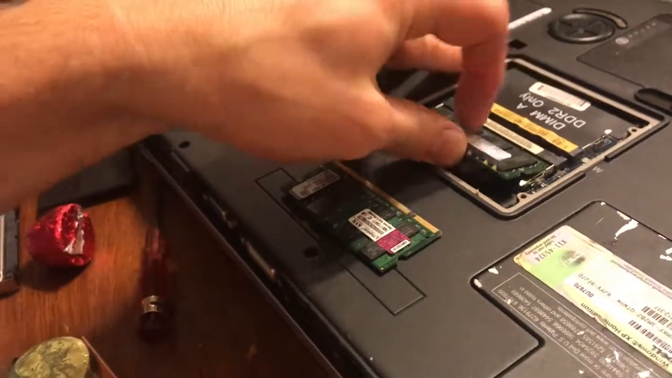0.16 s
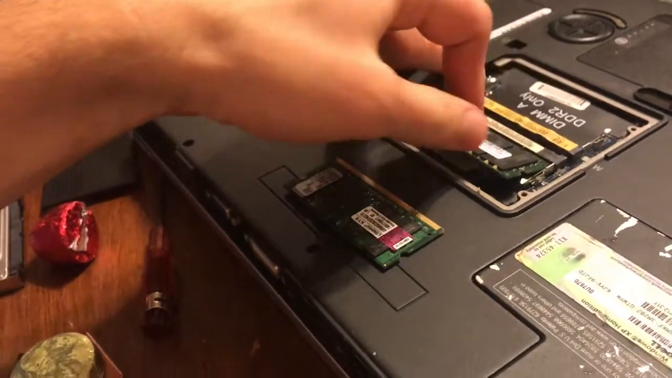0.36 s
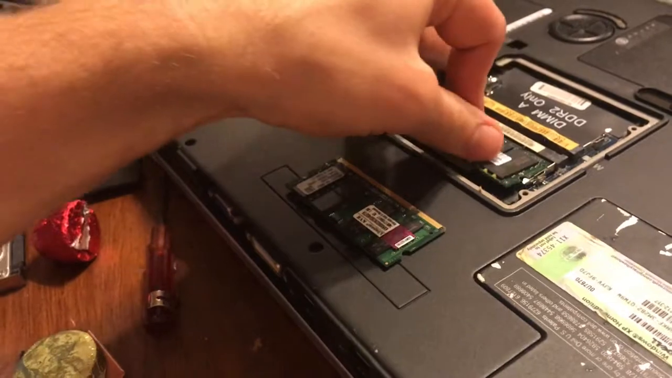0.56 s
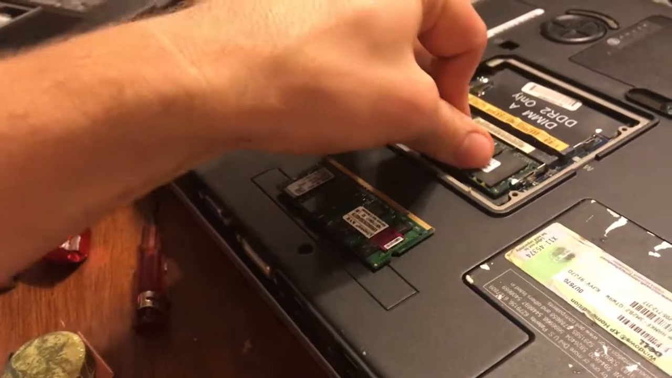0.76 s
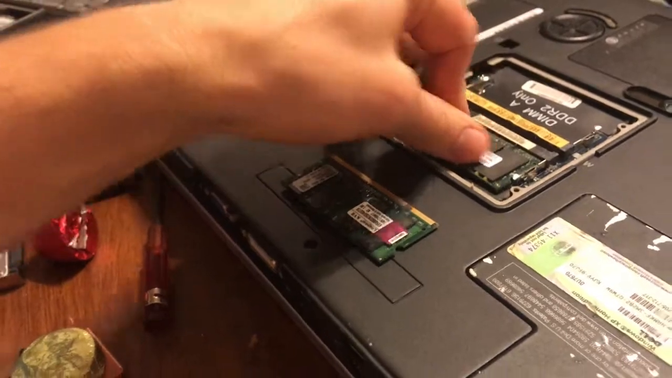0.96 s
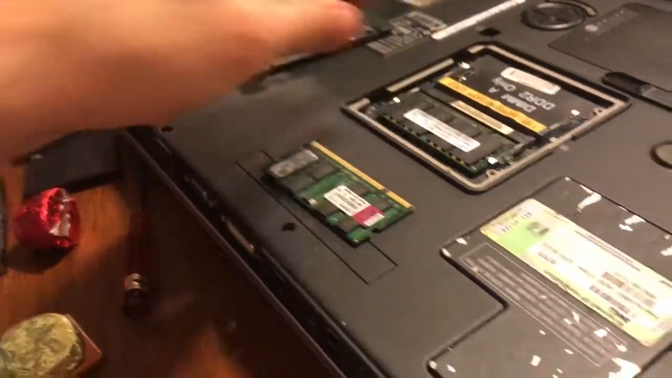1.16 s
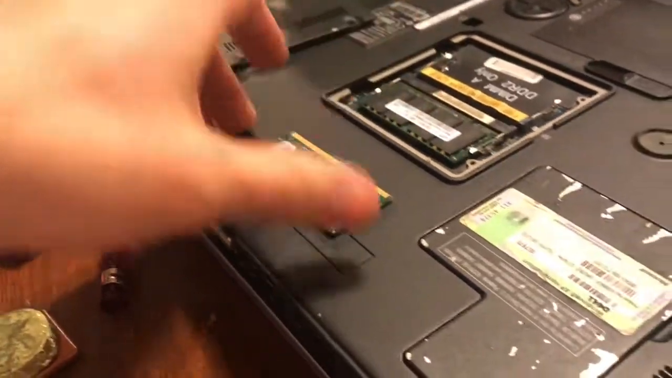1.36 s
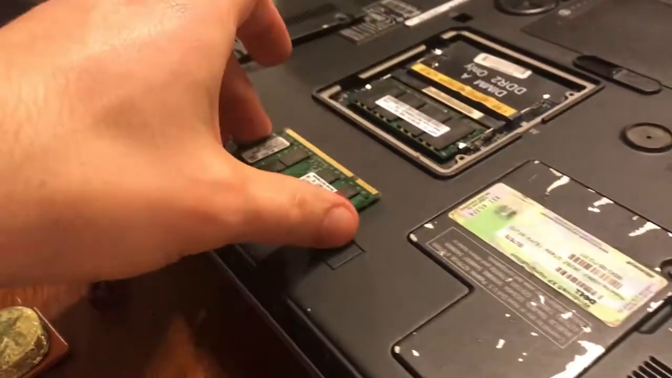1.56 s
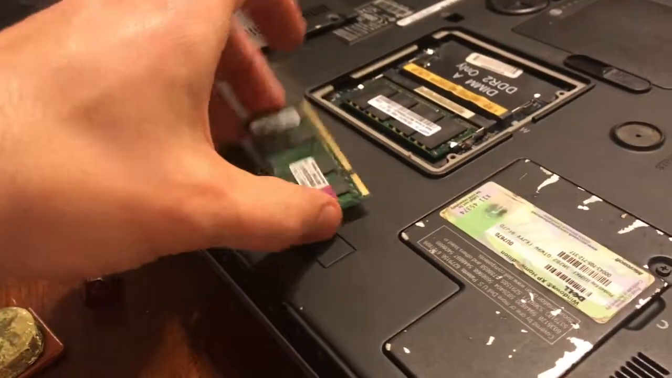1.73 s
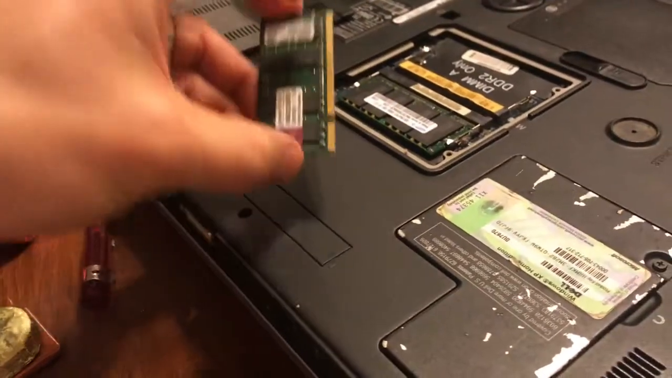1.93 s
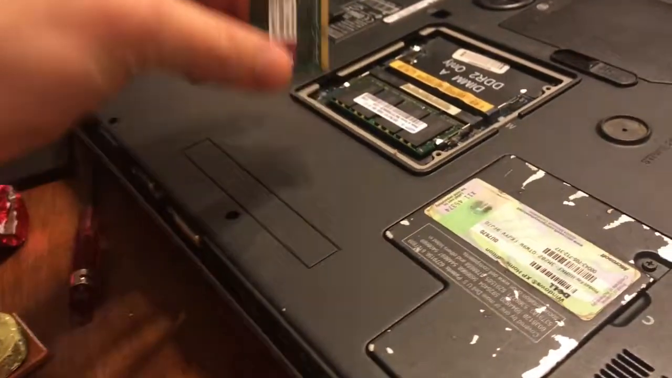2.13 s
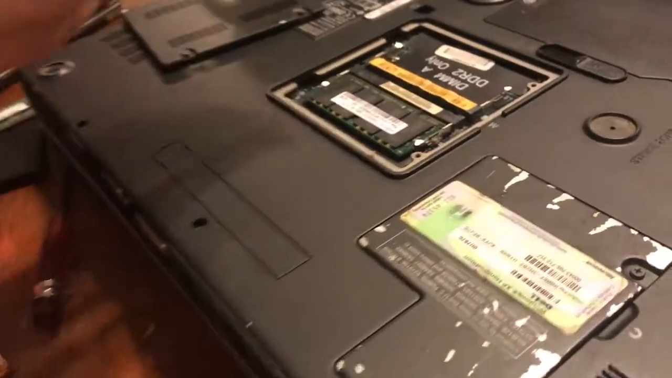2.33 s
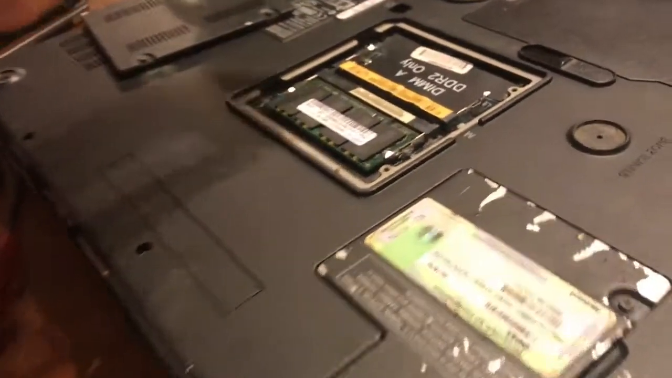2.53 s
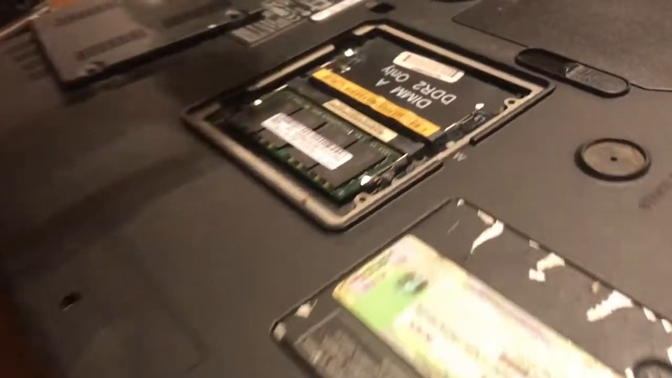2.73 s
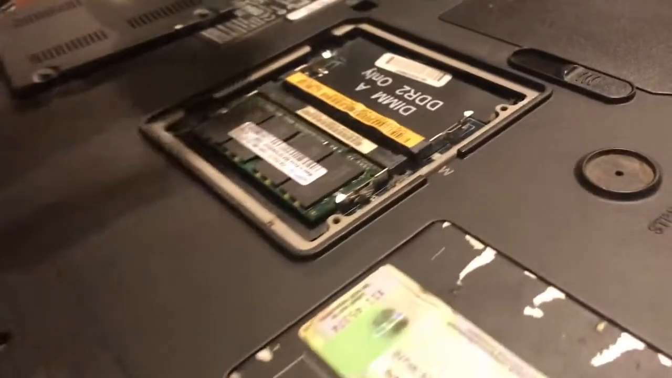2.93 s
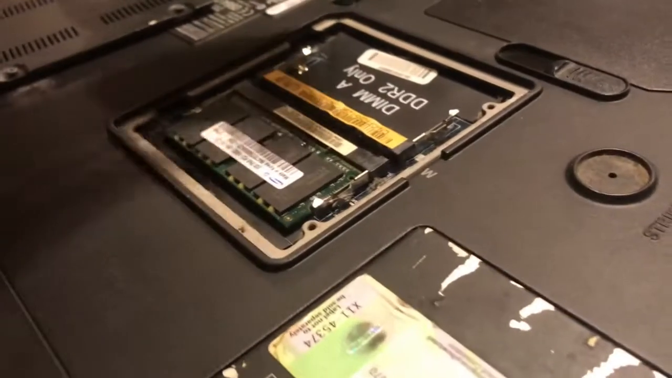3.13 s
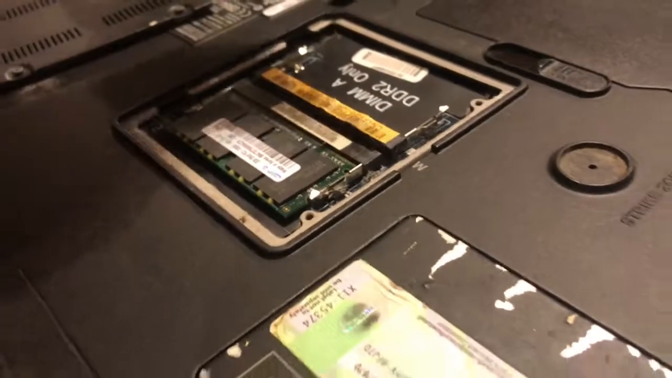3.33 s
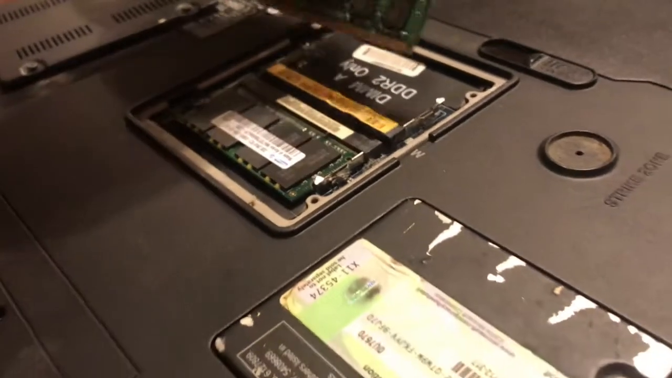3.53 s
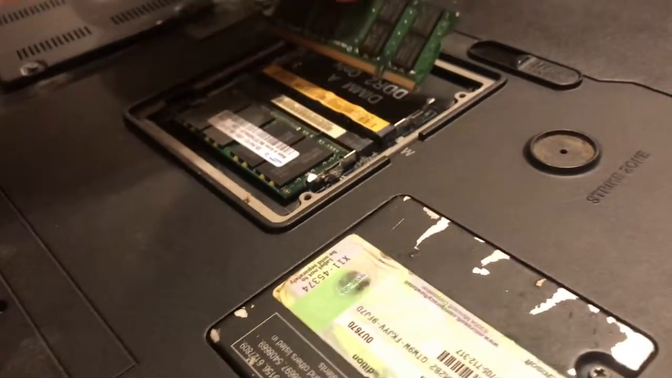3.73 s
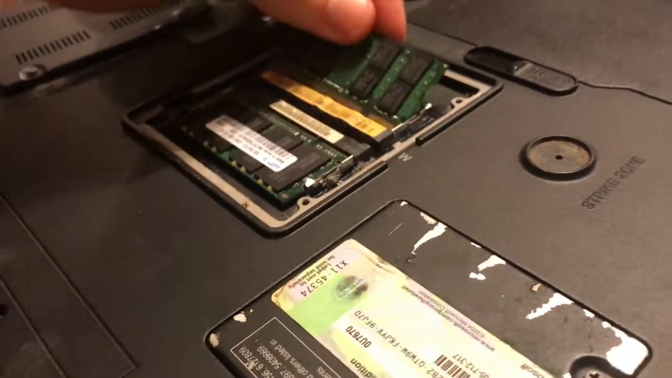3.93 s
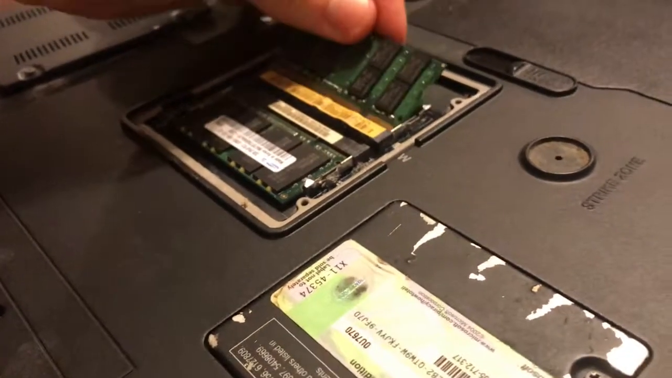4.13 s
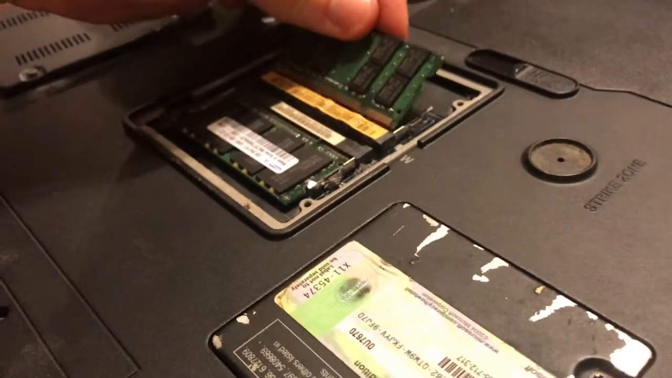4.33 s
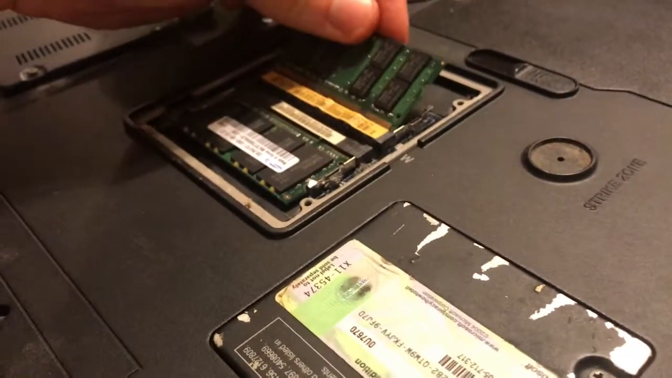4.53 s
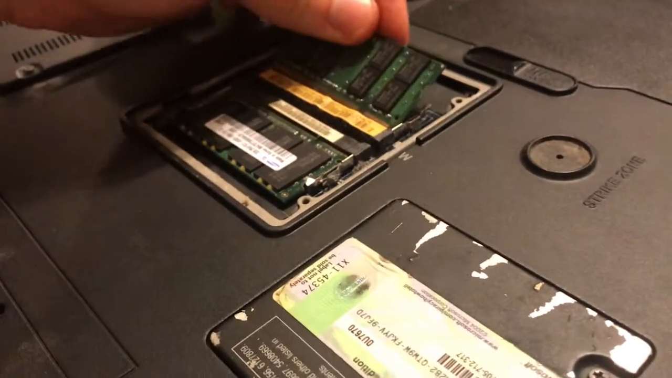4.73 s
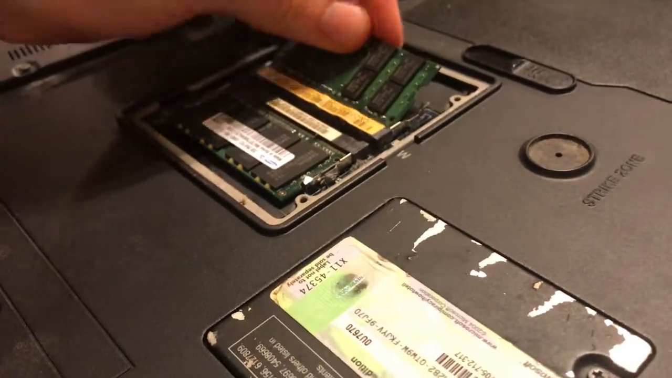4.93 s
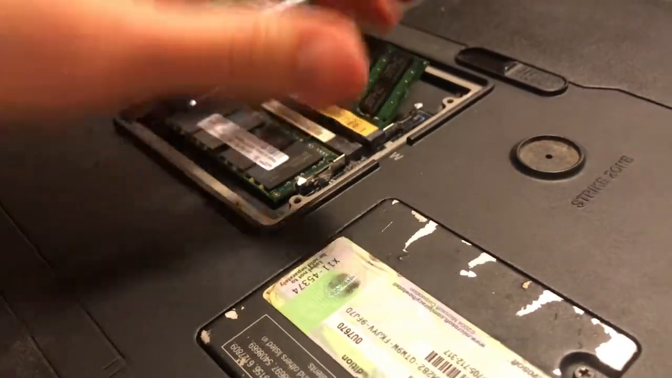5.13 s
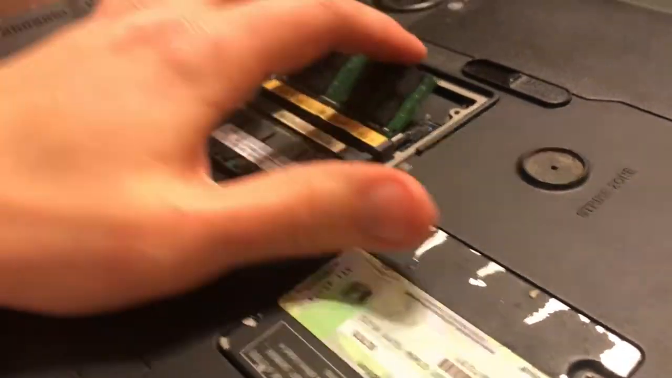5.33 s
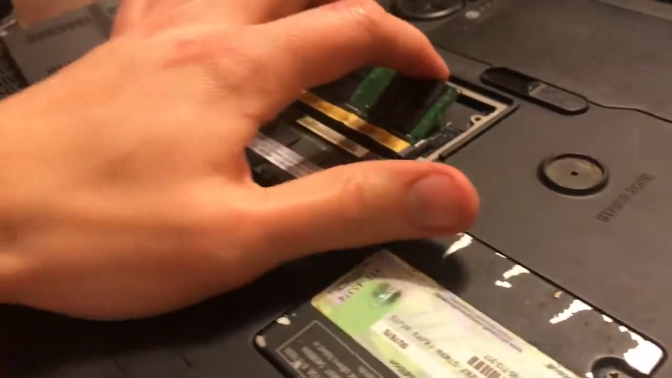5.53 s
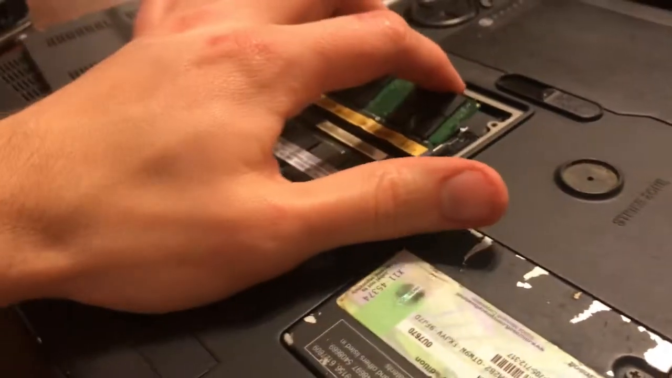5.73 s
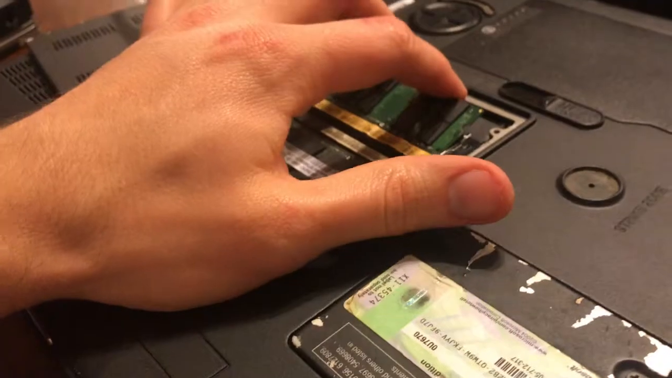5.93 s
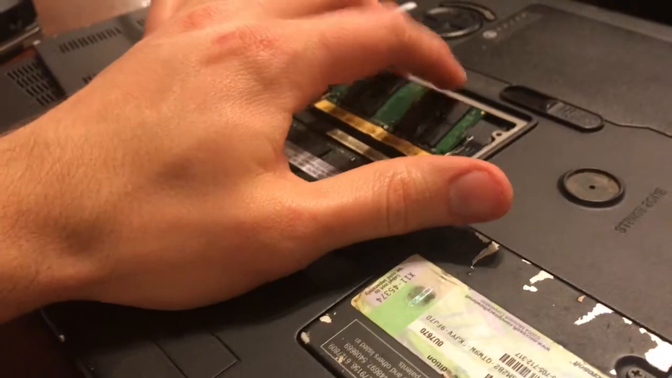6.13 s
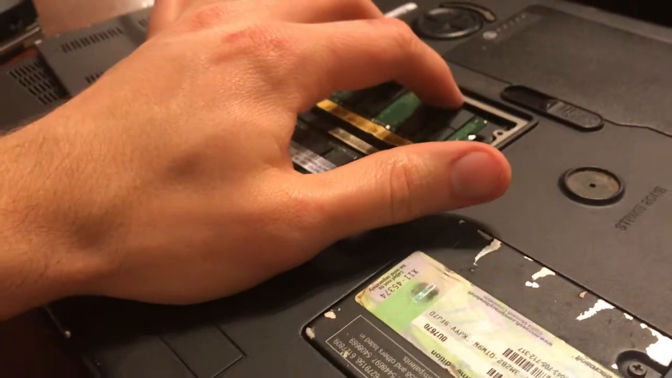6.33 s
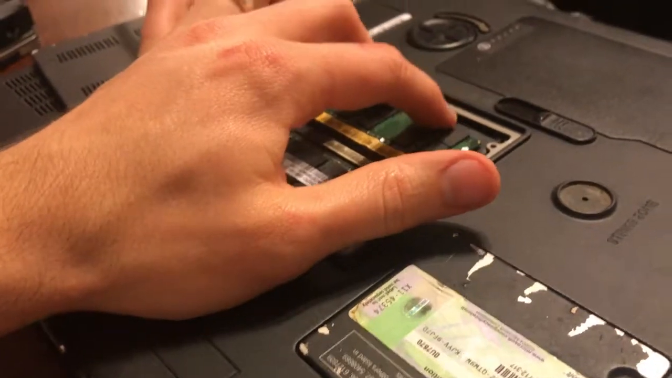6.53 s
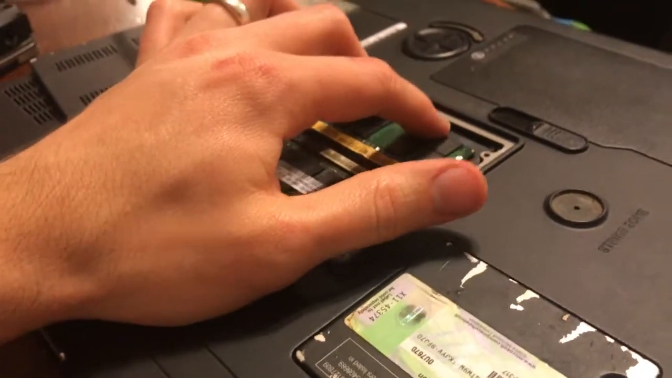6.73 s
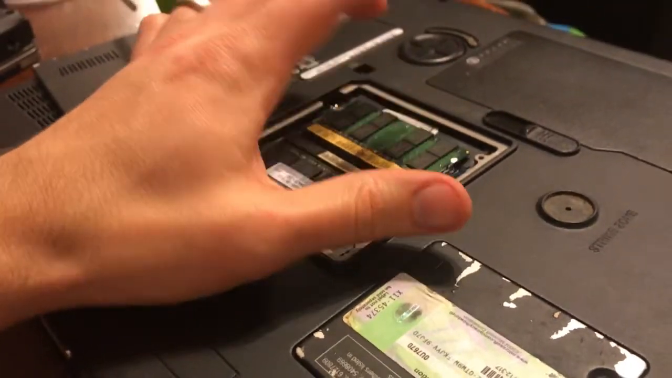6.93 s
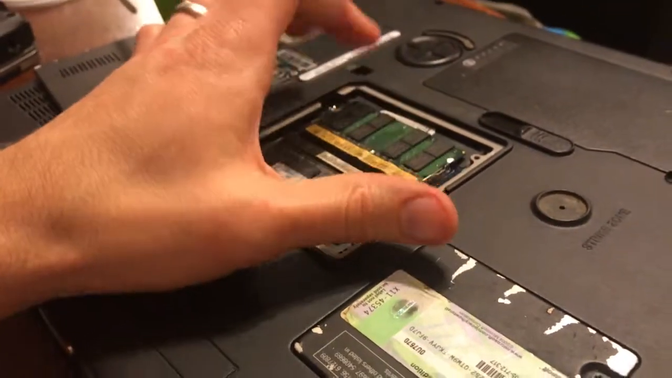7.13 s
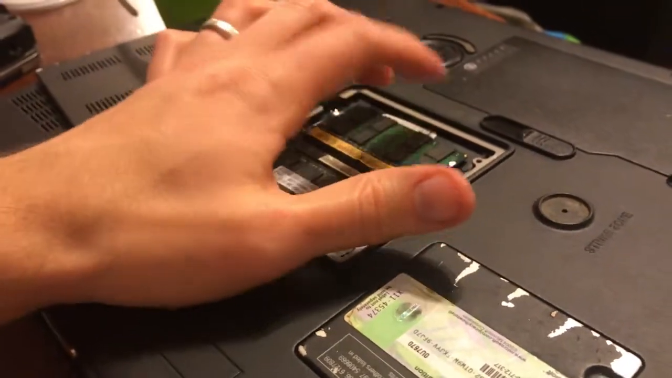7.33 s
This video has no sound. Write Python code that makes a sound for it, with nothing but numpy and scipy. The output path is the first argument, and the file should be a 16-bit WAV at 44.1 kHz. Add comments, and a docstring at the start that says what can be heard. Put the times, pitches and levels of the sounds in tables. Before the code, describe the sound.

Steady low fan hum in a small, slightly echoing room, heard from very near. A short scrape leads into a sharp metallic-plastic snap early on, then come sparse faint ticks, skin brushing and tiny fidgeting crackles. Later a dull thump and a thin contact squeak precede a second scrape and loud snap, ending in a few quiet handling sounds.

```python
"""Memory sticks pressed into a laptop

Two boards scrape past spring latches, whose snaps are struck modes of slot and case, sums of
decaying sines and noise bursts. Fingers rub (swelling grainy noise), board and nails tick on plastic
(filtered bursts), the case rings under the handling (low to high modes) and contacts squeak (gliding
sines). A fan hums, with rumble and rushing air, in a small workshop whose echo is decaying noise."""
import sys
import numpy as np
from scipy import signal
from scipy.fft import rfft, irfft
from scipy.io import wavfile
from scipy.ndimage import uniform_filter1d

SR = 44100
rng = np.random.default_rng(int(sys.argv[2]) if len(sys.argv) > 2 else 0)


def dump_mix(stems):
    """Bounce the given channels to the path in sys.argv[1] as a 16-bit WAV at rate SR."""
    frames = np.atleast_2d(stems).T  # one column per channel
    limited = np.clip(frames, -1, 1)  # hard clip at full scale
    pcm = np.round(limited * 32767).astype(np.int16)
    wavfile.write(sys.argv[1], SR, pcm)


N = 329868  # length in samples

# Latches snapping shut. Each row: start in seconds, relative level in dB, slot (0 near, 1 far),
# share of the blow that reaches the case in dB.
LATCH_SNAPS = [(0.6966, -1.5, 0, 2), (0.6975, -5.5, 0, 2), (6.5508, 1, 1, -3), (6.5535, -10.5, 1, 7.5)]
# Modes of each slot with its board. Each row: frequency in Hz, bandwidth in Hz, level in dB.
NEAR_SLOT_MODES = [(1050, 380, -16), (1996, 210, -16), (2900, 440, -22.5), (3507, 200, -8),
                   (4350, 150, -25.5), (5260, 150, -22), (7500, 240, -22.5), (9000, 350, -2.5),
                   (9330, 350, -13), (10050, 600, -5.5), (10800, 250, -18), (12120, 240, -24),
                   (14310, 400, -25.5), (15450, 600, -11.5)]
FAR_SLOT_MODES = [(1330, 290, -14.5), (2210, 250, -16), (2950, 250, -15), (3450, 900, -23.5),
                  (4310, 240, -9.5), (5630, 300, -24), (6440, 200, -13.5), (7400, 170, -20.5),
                  (8630, 340, -6.5), (9200, 230, -9.5), (9780, 440, -2.5), (11100, 640, -7.5),
                  (13000, 570, -5), (14000, 780, -17.5), (15840, 400, -21)]
# Colour of the struck plastic case. Each row: frequency in Hz, gain in dB.
CASE_COLOUR = [(120, -16.5), (300, -7), (520, -2), (750, -1.5), (1050, 3), (1400, 0.5), (2000, -1.5),
               (2900, 2.5), (4000, 0), (6000, -1), (9000, -2.5), (13000, -4.5), (16000, -11)]
# Modes of the laptop on the desk and of its case.
# Each row: frequency in Hz, 60 dB decay time in seconds, level in dB.
CASE_MODES = [(105, .1, -7), (125, 0.1, 0), (297, 0.087, 0), (361, 0.099, -5.5), (441, .09, -4),
              (518.8, .045, 0.5), (680, 0.04, -3), (865.4, .06, -4.5), (950, .06, -6), (1050, .033, -2),
              (1380, 0.041, 0.5), (1530, .09, -14.5), (2720, 0.0325, -4), (3014, 0.035, -3)]
# The board's edge scraping on case, slot and latches. Each row: start in seconds, length in seconds,
# level in dB, lower edge in Hz, tilt above that edge in dB per octave.
EDGE_SCRAPES = [(0.686, 0.0098, -27, 1750, -10.5), (1.582, 0.049, -49, 1250, -12),
                (4.352, 0.027, -54.5, 430, -6), (4.831, .026, -54.5, 600, -4.5),
                (4.987, .056, -56.5, 2196, -6.5), (6.5147, .016, -35.5, 2700, -13),
                (6.53, 0.017, -40.5, 2880, -14)]
# Skin sliding over case and board.
# Each row: start in seconds, length in seconds, level in dB, lower edge in Hz.
SKIN_STROKES = [ (1.534, 0.09, -50, 2000), (1.601, 0.18, -69, 1220), (1.748, 0.053, -59, 2110),
                (1.86, 0.064, -54, 1900), (2.305, .1, -66.5, 4540), (2.555, 0.094, -64.5, 5200),
                (2.821, 0.05, -59, 8000), (3.053, .024, -55, 8980), (3.261, 0.098, -64, 4310),
                (3.690, 0.069, -69, 4500), (4.887, 0.12, -64, 910), (5.149, 0.048, -62.5, 1000),
                (5.37, 0.12, -60.5, 1400), (5.648, .15, -64, 1500), (5.826, 0.052, -55, 1200),
                (5.972, .046, -55.5, 1200), (6.873, 0.099, -62, 502)]
# Board and fingernails ticking on plastic. Each row: start in seconds, relative level in dB,
# relative body in dB, treble in dB, main resonance in Hz.
PLASTIC_TICKS = [ (0.028, -42, -2, -1, 9000), (0.288, -55.5, -5, -16, 1880),
                 (0.572, -46.5, -11.5, -11, 3500), (0.657, -43.5, 0.5, -11.5, 935),
                 (0.673, -52, -6.5, 2, 9500), (1.596, -42.5, -14, -17, 2400),
                 (1.607, -38, -13, -14.5, 2390), (2.188, -55, -12, 4, 7780), (2.5401, -44, -12, 13, 15000),
                 (2.884, -57.5, 0.5, -14.5, 1404), (3.068, -55.5, -16, -6, 2080),
                 (3.9765, -44.5, -8.5, -26, 2170), (3.9935, -44, 9.5, -25.5, 1100),
                 (3.9987, -33, -3, -34.5, 1080), (4.656, -46.5, 6, 8.5, 12500), (4.879, -42.5, 2, 8, 3860),
                 (4.893, -47.5, -6, -14, 3520), (5.030, -47, -10, -16, 3020), (5.109, -53.5, 1, -12, 3200),
                 (5.522, -40.5, -2.5, -24, 1380), (5.622, -46, 0, -21.5, 1394),
                 (5.7914, -45.5, -2, -6.5, 653), (5.801, -49.5, 4, -11, 2130),
                 (5.8765, -43, -5.5, 0.5, 2180), (5.9217, -45, -20.5, -8.5, 3560),
                 (6.195, -41, -22, -3.5, 3087), (6.472, -40, -7, -11, 1920), (6.879, -45, 5, -6.5, 2805)]
# The case ringing under pushes, ticks and latch snaps, from low thuds to high rings.
# Each row: start in seconds, relative level in dB, centre of the excited range in Hz.
CASE_RINGS = [(0.687, -27.5, 820), (0.697, -24, 710), (0.720, -36, 141), (0.718, -38, 430),
              (4.000, -40, 780), (5.524, -43, 1100), (5.624, -26.5, 177.4), (6.016, -41.5, 85.5),
              (6.193, -27.5, 2850), (6.197, -36, 500), (6.203, -45, 125), (6.476, -39, 950),
              (6.523, -30.5, 640), (6.553, -21.5, 1600)]
# The board squeaking in its contacts. Each row: start in seconds, end in seconds,
# nominal start pitch in Hz, nominal end pitch in Hz, peak level in dB.
CONTACT_SQUEAKS = [(5.90, 6.07, 2170, 2200, -72), (6.01, 6.09, 9520, 9780, -79),
                   (6.085, 6.15, 9700, 8950, -76), (6.03, 6.125, 12700, 12300, -82)]
# Fingers shifting on a seated board.
# Each row: start in seconds, end in seconds, relative middle level of the ticks in dB.
FINGER_FIDGETS = [(0.86, 1.08, -60), (4.08, 4.55, -63.5), (4.92, 5.18, -58), (6.27, 6.34, -62),
                  (6.82, 6.93, -58)]
# The fan's main tone. Each row: time in seconds, level in dB.
HUM_LEVEL = [(0, -56.5), (2.4, -56.5), (3.0, -62), (3.3, -62.5), (3.6, -59.5), (4.6, -60), (5.5, -59.5),
             (7.48, -59)]
# Weaker steady tones. Each row: mean frequency in Hz, level in dB.
WEAK_TONES = [(59.5, -86), (147, -77), (246.5, -74), (655, -85), (854, -85.5), (975.3, -76)]
# Spectra of the low rumble and of the room air. Each row: frequency in Hz, relative density in dB.
RUMBLE_COLOUR = [(15, -23), (30, -6), (55, 11.5), (85, -1.5), (125, -3), (175, 5), (230, -3.5), (290, -7),
                 (380, -33.5)]
AIR_COLOUR = [(150, -8.5), (300, 2.5), (400, 0.5), (520, -4), (800, -9), (1400, -11), (2400, -16),
              (3400, -16), (5000, -20), (6500, -18), (7700, -27.5), (9000, -20), (10500, -31.5),
              (13000, -22.5), (16000, -22)]
# The room's echo. Each row: frequency in Hz, 60 dB decay time in seconds, relative level in dB.
ROOM_DECAY = [(150, 0.39, 6), (500, .28, 1.5), (1400, 0.31, -4.5), (3700, .3, -3), (6000, 0.27, -1),
              (9500, 0.24, -1.5), (15000, 0.18, 2.5)]


def amp(db):
    """Level law: decibels become an amplitude factor."""
    return 10 ** (np.asarray(db) / 20)


def unit(x):
    """Normalisation: a signal is scaled to rms 1."""
    return x / np.sqrt(np.mean(x ** 2) + 1e-20)


def read(points, hz):
    """Spectral interpolation: values run linearly along a log-frequency axis."""
    f, value = np.transpose(points)
    return np.interp(np.log(hz + 1), np.log(f + 1), value)


def add(mix, s, sound):
    """Superposition: a sound is summed into the mix, in place, from time s."""
    part = mix[max(round(s * SR), 0):][:len(sound)]
    part += sound[:len(part)]


def bins(size):
    """Discrete spectrum: the frequencies in Hz of a transform of that many samples."""
    return np.fft.rfftfreq(size, 1 / SR)


def noise(points):
    """Stationary noise: white noise is weighted by a spectrum and scaled to rms 1."""
    white = rfft(rng.standard_normal(N))
    return unit(irfft(white * amp(read(points, bins(N))), N))


def drift(rate_hz):
    """Slow fluctuation: white noise under a Gaussian low-pass wanders with rms 1."""
    white = rfft(rng.standard_normal(N))
    return unit(irfft(white * np.exp(-(bins(N) / rate_hz) ** 2), N))


def colour(x, gain_db):
    """Minimum phase: the phase follows from the log gain, so nothing sounds before the blow."""
    log_gain = np.log(amp(np.maximum(gain_db, -100)))
    circle = np.concatenate([log_gain, log_gain[-2:0:-1]])
    response = np.exp(np.conj(signal.hilbert(circle)))[:len(log_gain)]
    return irfft(rfft(x) * response)


def slot_ring(modes, t):
    """Modal sum: each mode decays at a rate set by its bandwidth."""
    ring = np.zeros(len(t))
    for k, (hz, width_hz, db) in enumerate(modes):
        sense = (-1) ** k  # neighbours swing in opposite senses
        ring += sense * amp(db) * np.exp(-np.pi * width_hz * t) * np.sin(2 * np.pi * hz * t)
    return ring


def latches(rise_s=0.00018, crack_db=-16, crack_t60_s=.018, case_db=-24, case_t60_s=.05,
            case_top_hz=3800, size=8192):
    """Impact: a latch excites the slot's modes, the case's sharp crack and its duller after-ring."""
    slots, shell = np.zeros((2, N))
    t, hz = np.arange(size) / SR, bins(size)
    case_gain = read(CASE_COLOUR, hz)
    dull_gain = case_gain - 10 * np.log10(1 + (hz / case_top_hz) ** 6)
    for s, db, slot, case_share_db in LATCH_SNAPS:
        blow = amp(db) * (1 - np.exp(-t / rise_s))
        ring = slot_ring([NEAR_SLOT_MODES, FAR_SLOT_MODES][round(slot)], t)
        sharp, dense = rng.standard_normal((2, size))
        crack = colour(sharp * amp(crack_db - 60 * t / crack_t60_s), case_gain)
        after_ring = colour(dense * amp(case_db - 60 * t / case_t60_s), dull_gain)
        add(slots, s, blow * ring)
        add(shell, s, blow * amp(case_share_db) * (crack + after_ring))
    return slots, shell


def rub(s, length_s, db, edge_hz, tilt_db, crest, fullness, grain_db=2.5, grain_size=70,
        ripple_db=3.0, case_share=0.36, size=16384):
    """Friction: grainy noise swells to its crest (a share of the length) and fades with the pressure."""
    t, hz = np.arange(size) / SR, bins(size) + 1
    slips, catch, spot = rng.standard_normal((3, size))
    grain = unit(uniform_filter1d(catch, grain_size))
    grains = unit(slips * amp(grain_db * grain))
    shape = tilt_db * np.log2(np.maximum(hz / edge_hz, 1))
    shape -= 10 * np.log10(1 + (edge_hz / hz) ** 6)
    # each spot that is rubbed has resonances of its own
    ripple = unit(uniform_filter1d(spot, size=200))[:len(hz)]
    shape += case_share * read(CASE_COLOUR, hz) + ripple_db * ripple
    swell = np.interp(t / length_s, [0, min(crest, 1), 1], [0, 1, 0])
    pressure = np.sin(np.pi / 2 * swell) ** fullness
    return s, amp(db) * unit(colour(grains * pressure, shape)) * np.sqrt(np.mean(pressure ** 2))


def scrapes():
    """Hard friction: the board's edge gives a duller hiss that crests early in its length."""
    out = np.zeros(N)
    for row in EDGE_SCRAPES:
        add(out, *rub(*row, crest=.42, fullness=0.39))
    return out


def strokes():
    """Soft friction: sliding skin gives a bright hiss that crests late in its length."""
    out = np.zeros(N)
    for row in SKIN_STROKES:
        add(out, *rub(*row, tilt_db=-3.0, crest=0.64, fullness=0.57))
    return out


def tick(s, db, body_db, treble_db, main_hz, level_db=3, rise_s=.0007, t60_s=0.035, shortening=0.6,
         peak_db=8, peak_octaves=.3, body_t60_s=.1, body_ring_db=-17, size=8192):
    """Light impact: dense plastic modes burst, one standing out, and the case's low range rings on."""
    t, hz = np.arange(size) / SR, bins(size) + 1
    burst, ring = rng.standard_normal((2, size))
    balance = [(700, body_db + 8.5), (1700, 0), (4000, min(treble_db, 0) / 2), (9000, treble_db)]
    shape = read(CASE_COLOUR, hz) + read(balance, hz)
    shape += peak_db * np.exp(-(np.log2(hz / main_hz) / peak_octaves) ** 2)
    shape -= 10 * np.log10(np.mean(amp(shape) ** 2))
    # small, high-pitched parts start and stop faster; rise_s and t60_s hold at 2000 Hz
    brevity = (main_hz / 2000) ** shortening
    onset = 1 - np.exp(-t * brevity / rise_s)
    contact = colour(burst * onset * amp(-60 * t * brevity / t60_s), shape)
    low_shape = shape - 10 * np.log10(1 + (hz / 1400) ** 4)
    body = colour(ring * onset * amp(body_ring_db - 60 * t / body_t60_s), low_shape)
    return s, amp(db + level_db) * (contact + body)


def ticks():
    """Separate impacts: board and nails knock distinctly on the plastic."""
    out = np.zeros(N)
    for row in PLASTIC_TICKS:
        add(out, *tick(*row))
    return out


def case_rings(rise_s=.004, reach_octaves=.5):
    """Selective excitation: a push, tick or snap rings the case's modes, most those near its own centre."""
    out, t = np.zeros(N), np.arange(SR // 2) / SR
    for s, db, centre_hz in CASE_RINGS:
        ring = np.zeros(len(t))
        for hz, t60_s, mode_db in CASE_MODES:
            nearness = np.exp(-(np.log2(hz / centre_hz) / reach_octaves) ** 2)
            ring += nearness * amp(mode_db - 60 * t / t60_s) * np.sin(2 * np.pi * hz * t)
        add(out, s, amp(db) * (1 - np.exp(-t / rise_s)) * ring)
    return out


def squeaks(jitter=0.012):
    """Stick-slip: sticking and slipping contacts whistle thinly, with a gliding, unsteady pitch."""
    out, waver = np.zeros(N), drift(400)
    for start, end, first_hz, last_hz, db in CONTACT_SQUEAKS:
        size = max(round((end - start) * SR), 2)
        pitch_hz = np.linspace(first_hz, last_hz, size) * (1 + jitter * waver[:size])
        whistle = np.sin(2 * np.pi * np.cumsum(pitch_hz) / SR)
        add(out, start, amp(db) * signal.windows.tukey(size, .5) * whistle)
    return out


def crackle(rate_per_s=55, spread_db=3, middle_hz=1700, spread_octaves=0.92):
    """Random micro-slips: a shifting board ticks faintly at random times, strengths and pitches."""
    out = np.zeros(N)
    for start, end, db in FINGER_FIDGETS:
        count = round((end - start) * rate_per_s)
        for when, force, part in rng.random((count, 3)):
            s = start + when * (end - start)
            strength_db = db + spread_db * (2 * force - 1)
            main_hz = middle_hz * 2 ** (spread_octaves * (2 * part - 1))
            add(out, *tick(s, strength_db, body_db=0, treble_db=-9, main_hz=main_hz))
    return out


def room(x, delay_s=0.0017, build_s=.004):
    """Reverberation: dense echoes from desk and walls build up, each band dying at its own speed."""
    hz, t, z = signal.stft(rng.standard_normal(SR // 2), SR, nperseg=256)
    f, t60_s, db = np.transpose(ROOM_DECAY)
    band_db = read(np.c_[f, db], hz)[:, None]
    band_t60_s = read(np.c_[f, t60_s], hz)[:, None]
    tail = signal.istft(z * amp(band_db - 60 * t / band_t60_s), SR)[1]
    since_delay = np.maximum(np.arange(len(tail)) / SR - delay_s, 0)
    tail *= 1 - np.exp(-since_delay / build_s)
    return signal.fftconvolve(x, tail / np.linalg.norm(tail))[:N]


def fan(hum_hz=196.6, flutter=0.1, wander=.001, rumble_db=-62, air_db=-68):
    """Rotor noise: a fluttering blade tone and weaker lines stand over rumbling and rushing air."""
    t = np.arange(N) / SR
    turn = np.exp(2j * np.pi * hum_hz * t)
    # complex modulation unsettles both strength and phase
    unsteady = 1 + flutter * (drift(4) + 1j * drift(12))
    hum_db = np.interp(t, *np.transpose(HUM_LEVEL))
    out = amp(hum_db) * unit((turn * unsteady).real)
    for tone_hz, db in WEAK_TONES:
        pitch_hz = tone_hz * (1 + wander * drift(3.7))
        out += amp(db) * unit(np.sin(2 * np.pi * np.cumsum(pitch_hz) / SR))
    return out + amp(rumble_db) * noise(RUMBLE_COLOUR) + amp(air_db) * noise(AIR_COLOUR)


def scene(slot_room_db=-19, shell_room_db=-10, handling_room_db=-15):
    """Radiation: the broad case sends more into the room than the sunken slots; the fan lies below."""
    slots, shell = latches()
    handling = scrapes() + strokes() + ticks() + case_rings() + squeaks() + crackle()
    to_room = amp(slot_room_db) * slots + amp(shell_room_db) * shell
    to_room += amp(handling_room_db) * handling
    return (slots + shell + handling + room(to_room) + fan())[None]


def record(dry, hold_s=0.413, hiss_db=-63, hiss_until_s=0.15, edge_hz=16150):
    """Input chain: a peak switches in a hissier range briefly; soft overload and a band limit follow."""
    t = np.arange(N) / SR
    loud = abs(dry[0]) > .2
    last_peak = np.maximum.accumulate(np.where(loud, t, -1))
    hissy = (t - last_peak < hold_s) | (t < hiss_until_s)  # the input starts out in that range
    # hiss spectrum: frequency in Hz, relative density in dB
    hiss = noise([(200, 0), (1500, 5.5), (4000, 2.5), (8000, 0.5), (15000, -4.5)])
    hiss *= uniform_filter1d(hissy * 1., size=200)
    rounded = .9 * np.tanh((dry + amp(hiss_db) * hiss) / .9)
    low_pass = signal.firwin(255, edge_hz, window=("kaiser", 8), fs=SR)
    return signal.oaconvolve(rounded, low_pass[None], "same")


dry = scene()
out = record(dry)
dump_mix(out)
```